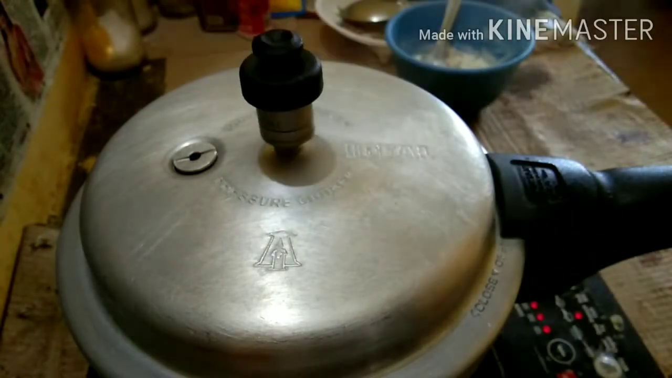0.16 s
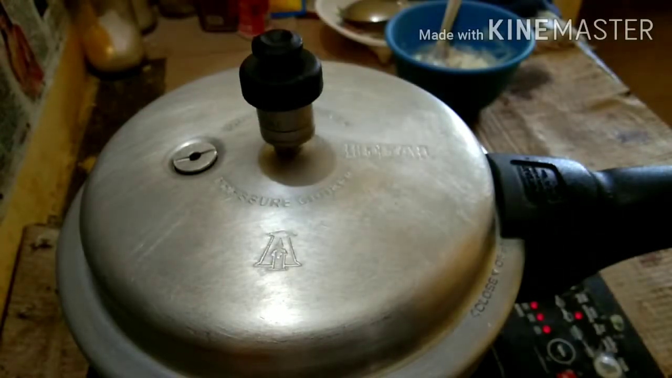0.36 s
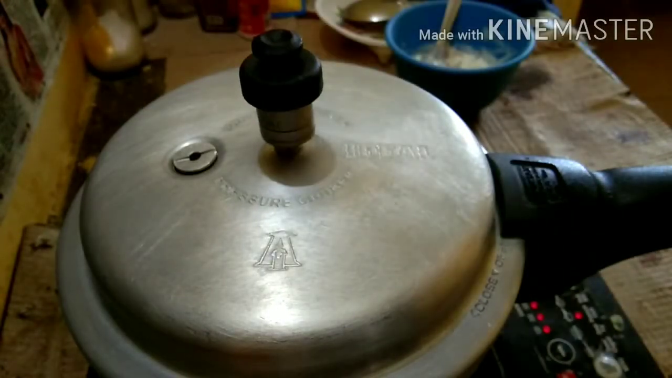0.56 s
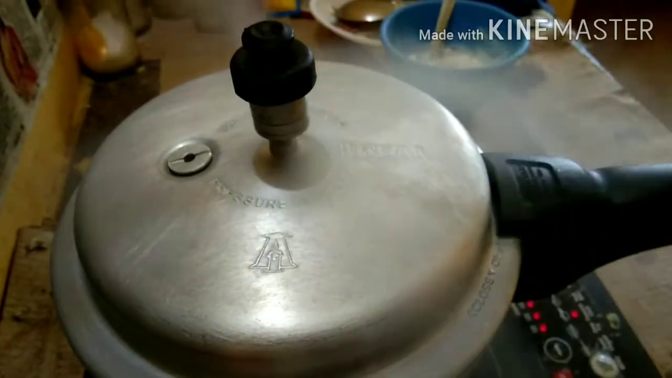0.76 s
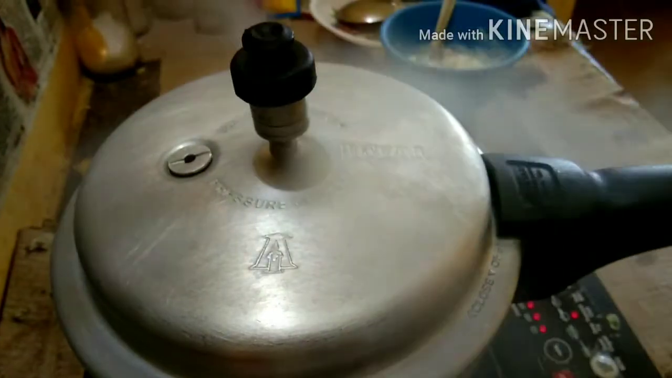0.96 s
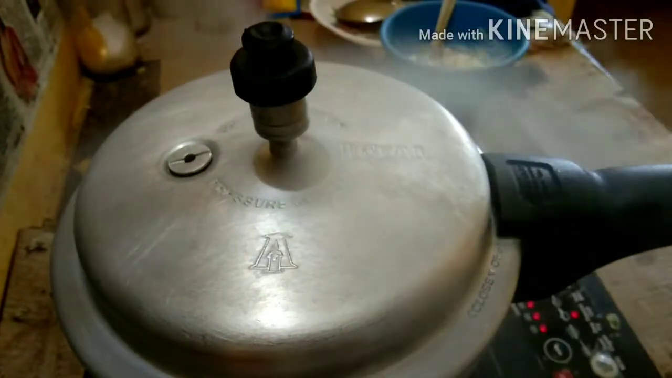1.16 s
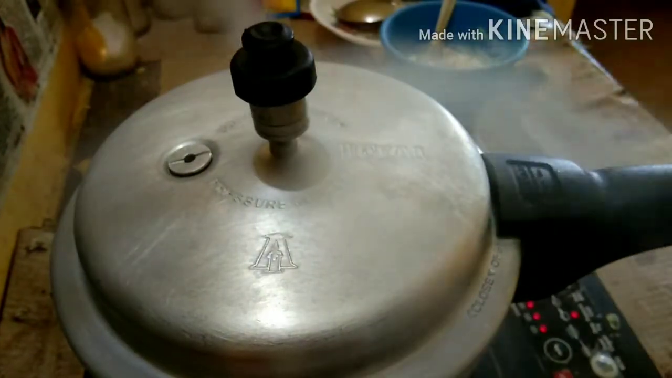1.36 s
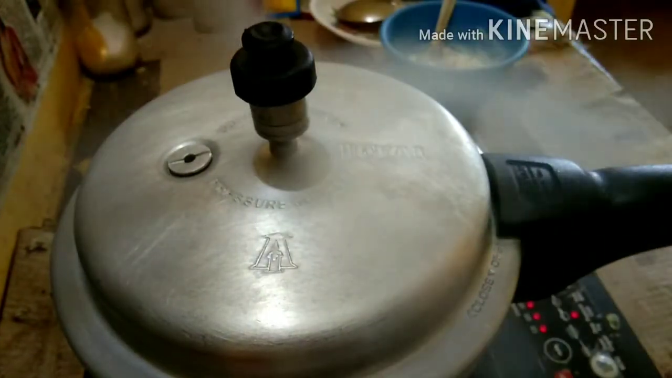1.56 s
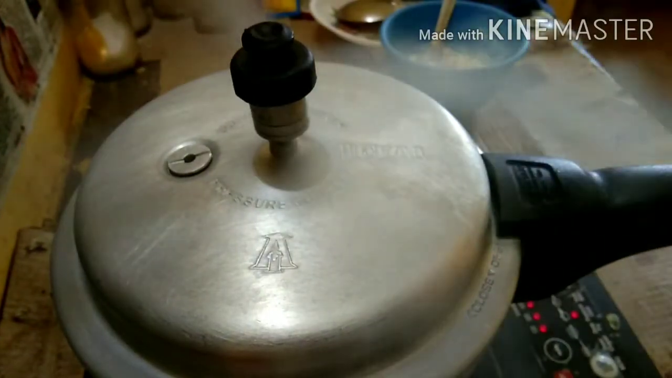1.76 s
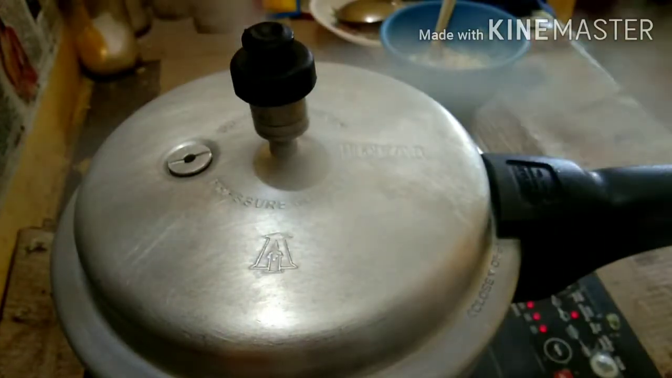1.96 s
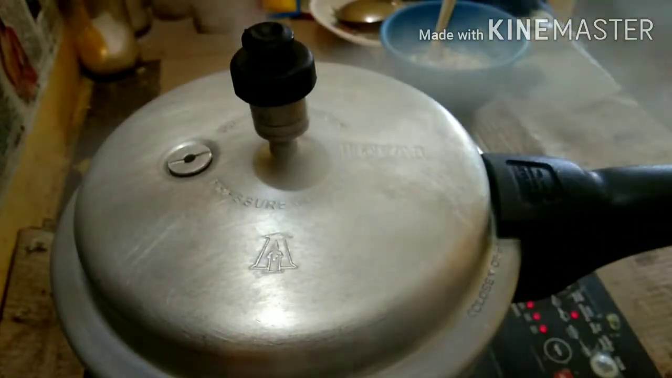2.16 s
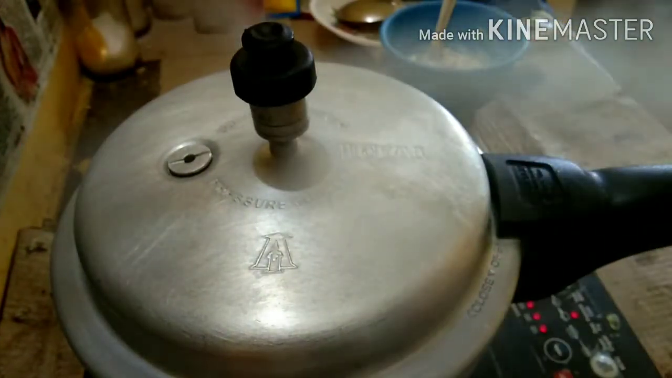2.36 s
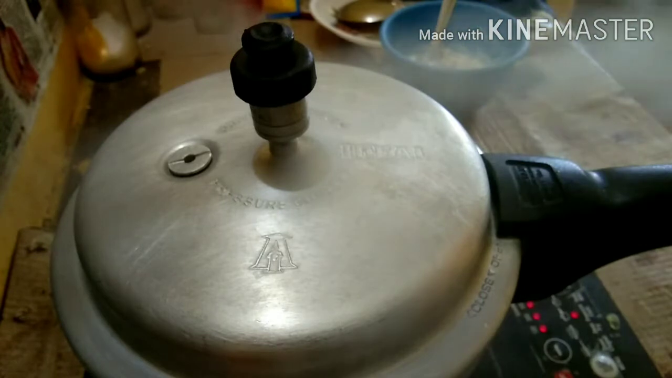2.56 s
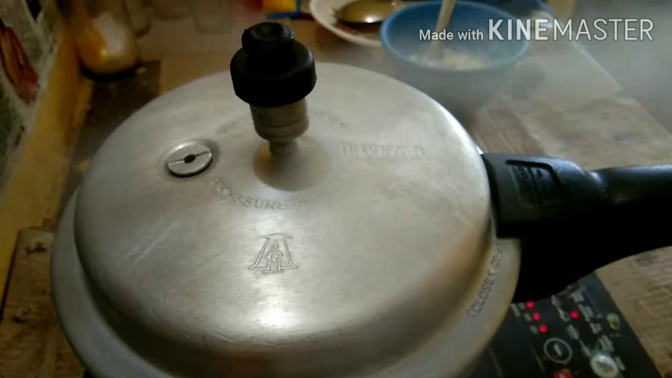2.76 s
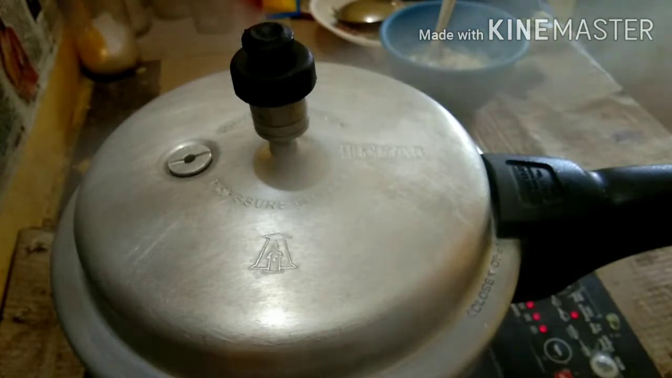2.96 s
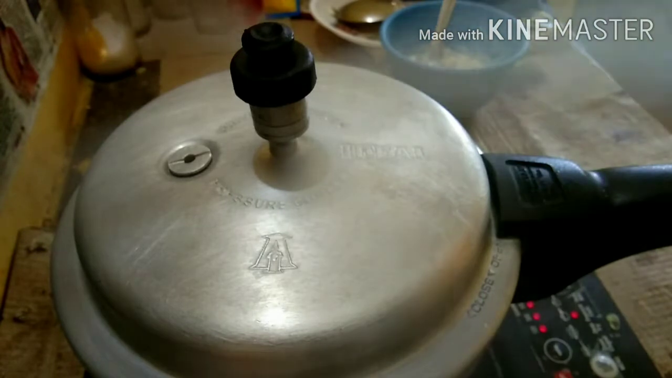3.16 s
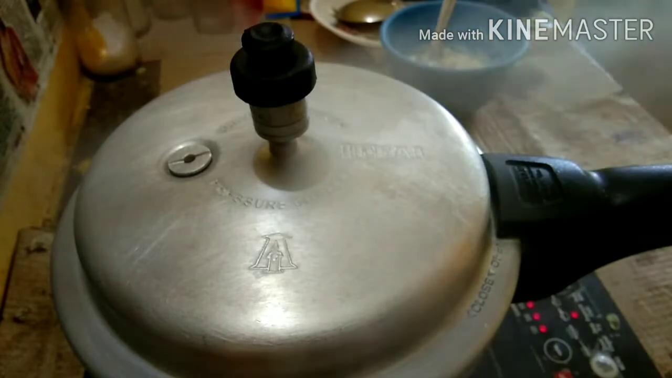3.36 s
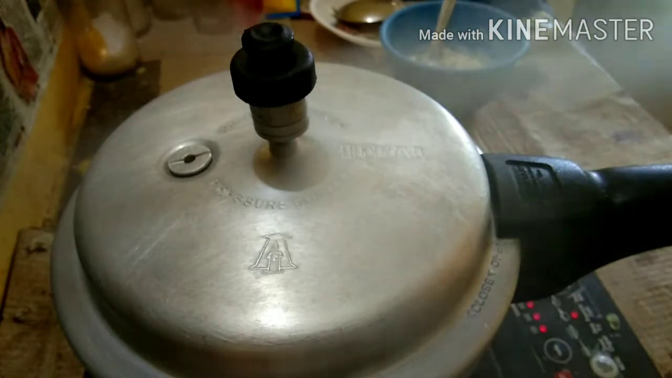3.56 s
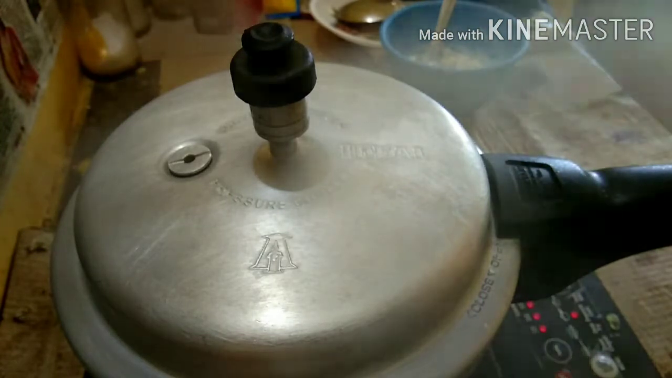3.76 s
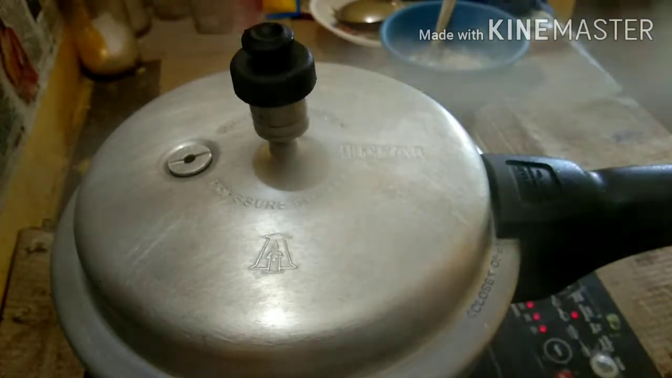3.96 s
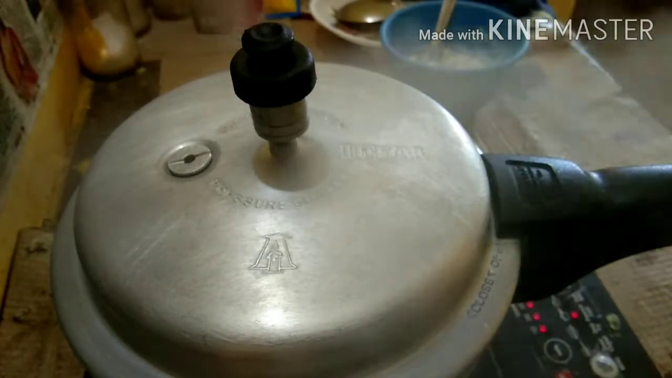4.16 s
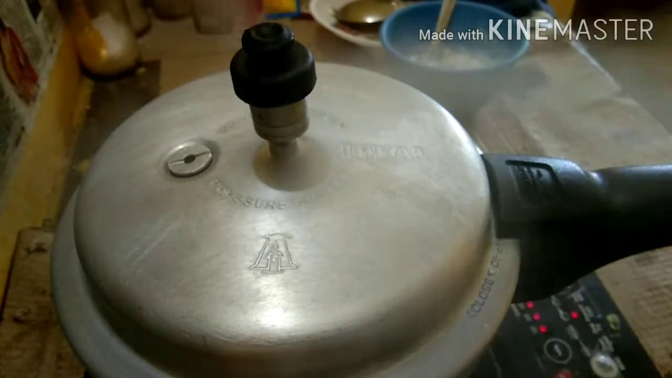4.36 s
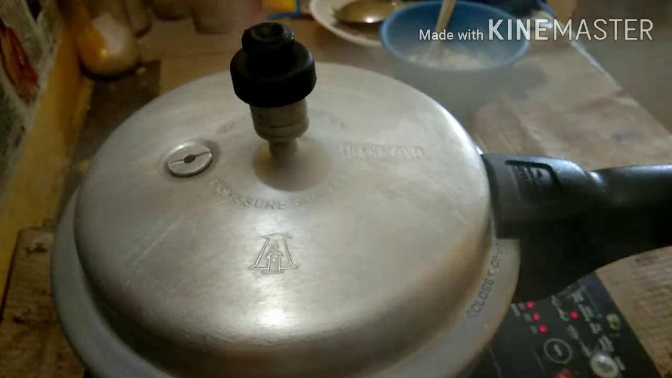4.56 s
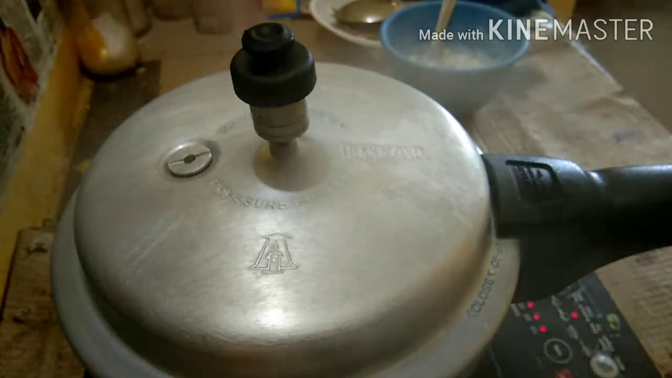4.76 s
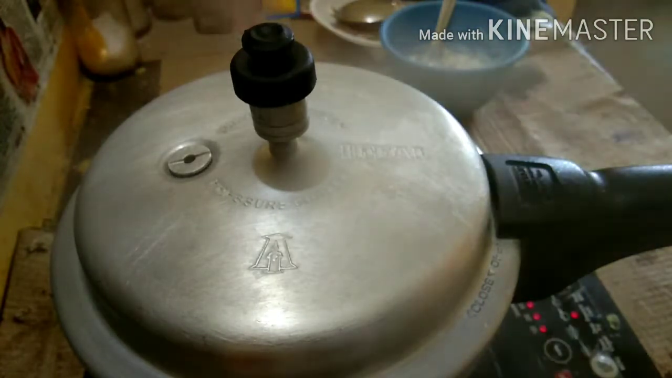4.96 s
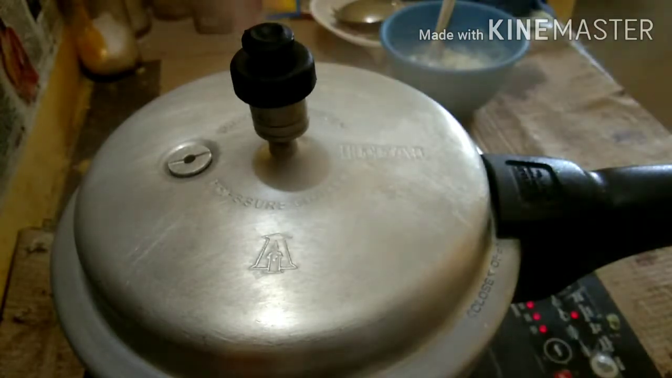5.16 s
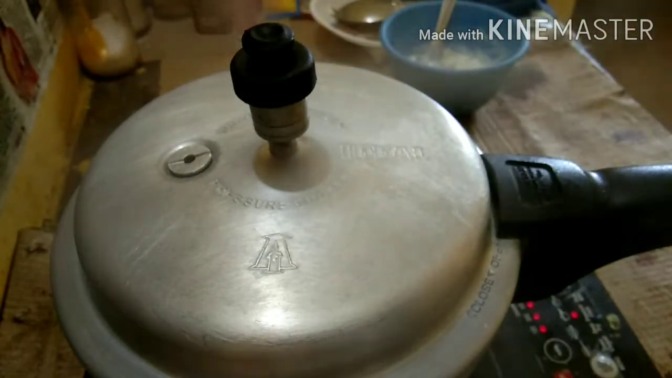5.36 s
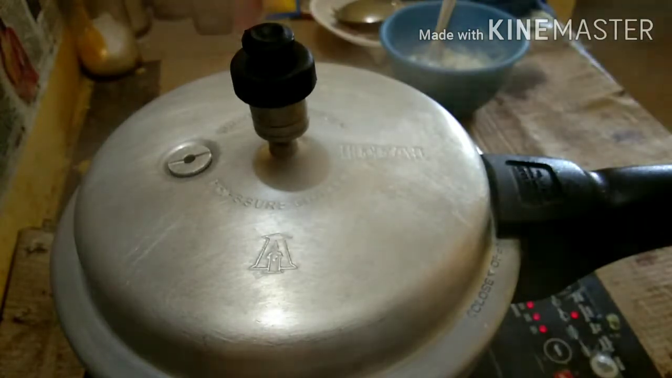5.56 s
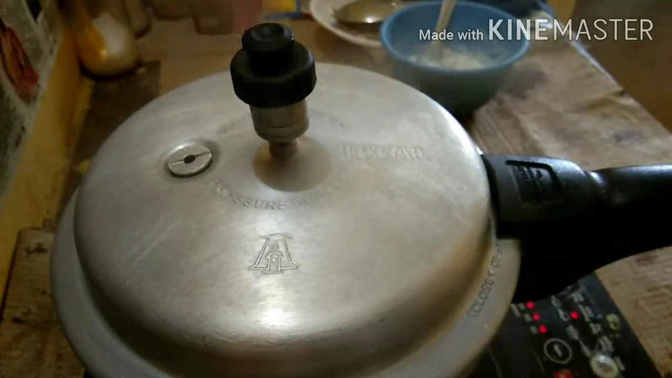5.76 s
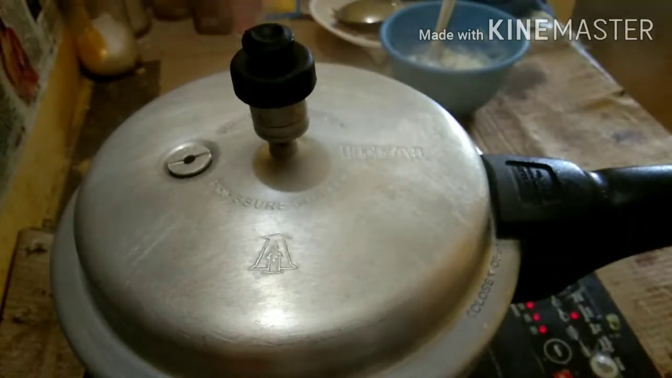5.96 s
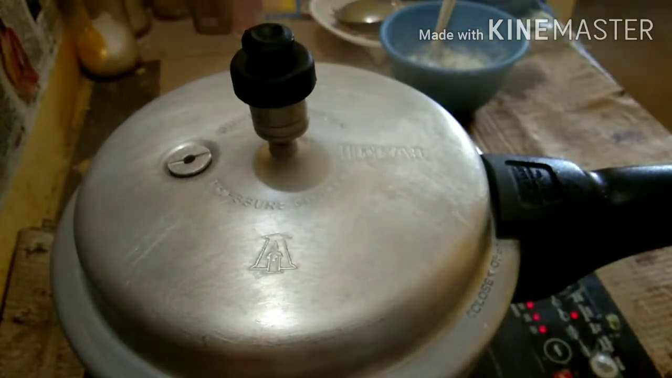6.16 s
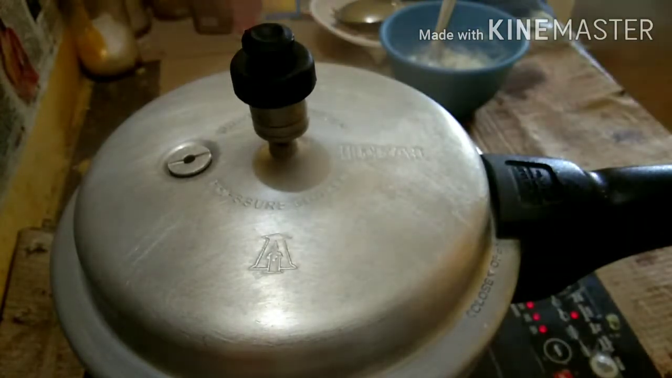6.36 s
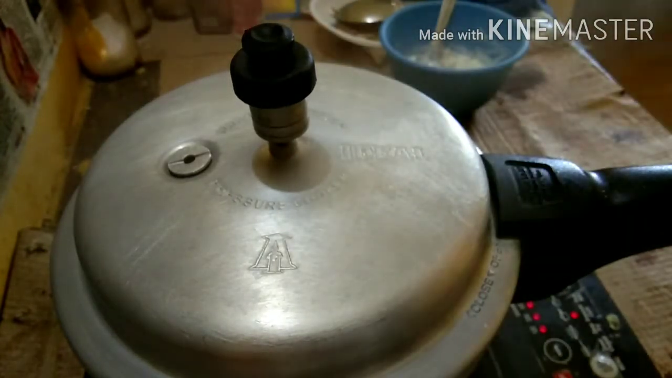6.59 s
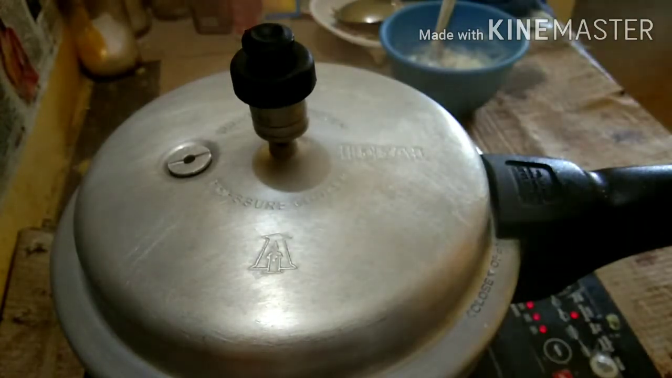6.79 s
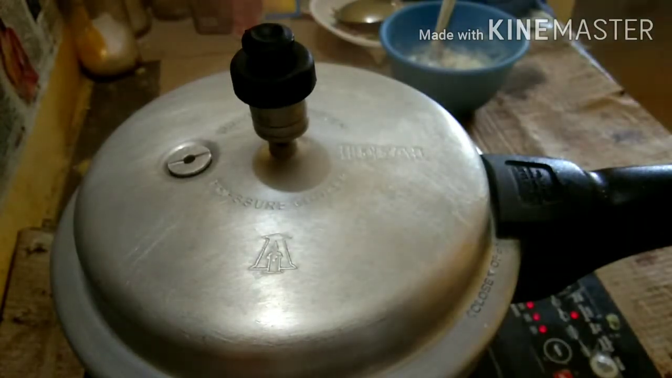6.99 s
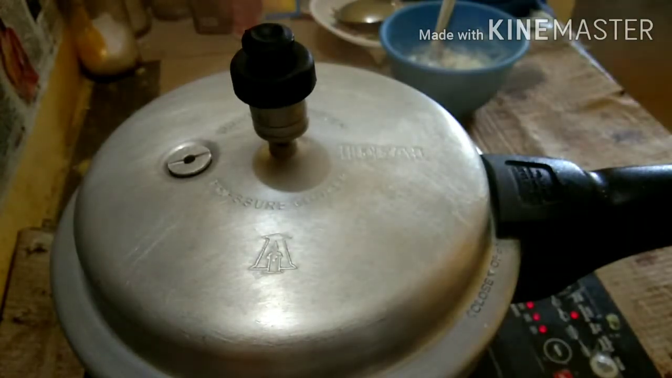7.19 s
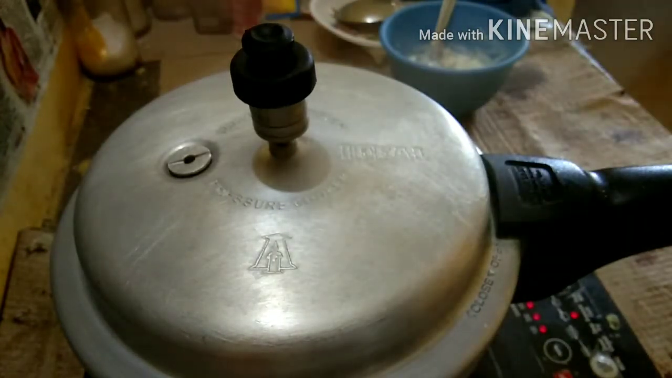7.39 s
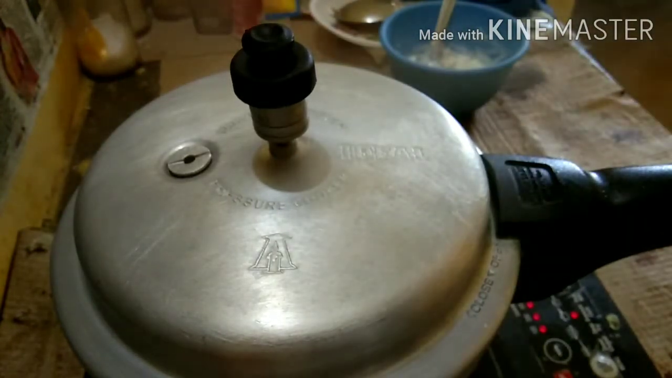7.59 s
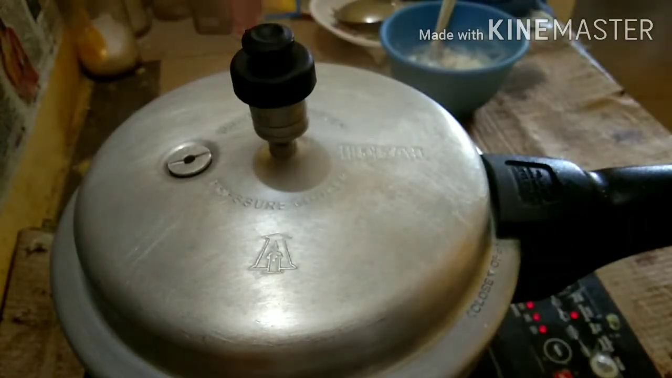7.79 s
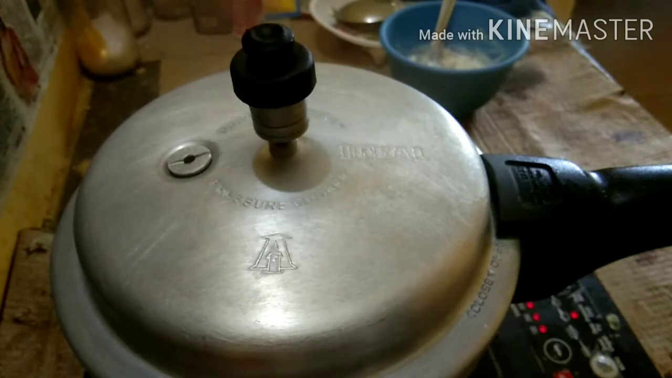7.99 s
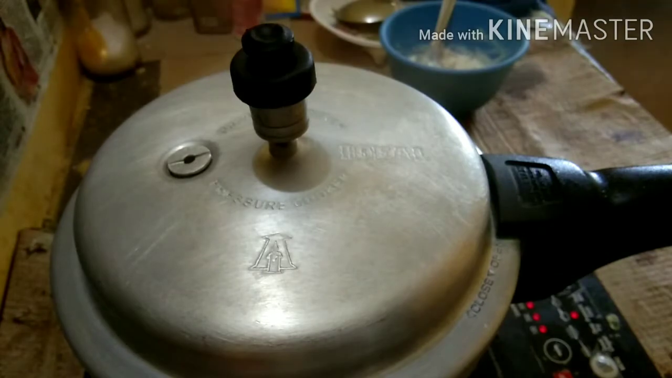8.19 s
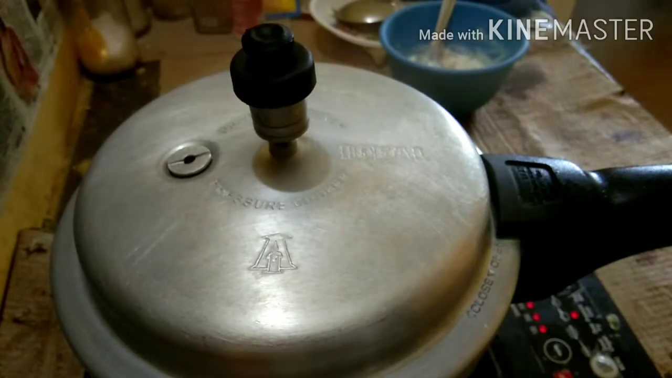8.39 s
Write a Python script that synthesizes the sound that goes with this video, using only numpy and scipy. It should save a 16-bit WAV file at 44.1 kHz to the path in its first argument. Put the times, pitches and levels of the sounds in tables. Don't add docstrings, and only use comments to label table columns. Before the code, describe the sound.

Close phone pickup of a pressure cooker on a hob. Dense, sharp steam roars through the valve almost unchanged for about seven seconds, with fine flutter and slight shifts of colour. The jet chokes off suddenly, the weight knocks lightly on the metal lid and bounces, and the walls ring briefly. Then near silence, with a low fan hum and a faint steam seep creeping up.

```python
import sys
import numpy as np
from scipy import signal
from scipy.io import wavfile
from scipy.ndimage import uniform_filter1d

SR = 44100
rng = np.random.default_rng(int(sys.argv[2]) if len(sys.argv) > 2 else 0)


def volts_from_decibels(level):
    exponent = np.asarray(level, float) / 20
    return 10 ** exponent


def persist_wave(psi):
    counts = np.round(np.clip(psi, -1, 1) * 32767).astype(np.int16)
    wavfile.write(sys.argv[1], SR, np.atleast_2d(counts).T)


N = 371763
T = np.arange(N) / SR
HOP, BINS = 512, np.fft.rfftfreq(2048, 1 / SR)
FRAMES = np.arange(N // HOP + 5) * HOP / SR

SINKS_S, SHUTS_S, SHUT_TIME_S = (6.9, 7.08), 7.3245, 0.0058
SAG_S, CHOKE_S = 1.5, 0.041
RECOVERS_S = 7.67


def evened(x):
    return x / np.sqrt(np.mean(x ** 2) + 1e-20)


def read(points, hz):
    f, value = np.transpose(points)
    return np.interp(np.log(hz + 1), np.log(f + 1), value)


def bump(hz, width):
    return 1 / (1 + (2 * (BINS[:, None] - hz) / width) ** 2)


def hiss(field_db):
    a, b = rng.standard_normal((len(FRAMES), len(BINS), 2)).T
    spectrum = (a + 1j * b) * volts_from_decibels(field_db)
    return evened(signal.istft(spectrum, nperseg=2048, noverlap=2048 - HOP)[1][:N])


def streaks(bins, frames):
    noise = rng.standard_normal((len(FRAMES), len(BINS))).T
    for _ in range(2):
        noise = uniform_filter1d(noise, int(bins), 0)
        noise = uniform_filter1d(noise, int(frames), 1)
    return evened(noise)


def band(x, lo_hz, hi_hz):
    return signal.sosfilt(signal.butter(4, [lo_hz, hi_hz], "band", fs=SR, output="sos"), x)


def burst(noise, lo_hz, hi_hz, length_s):
    arch = np.sin(np.pi * np.clip(T[:len(noise)] / length_s, 0, 1))
    return evened(band(noise, lo_hz, hi_hz)) * arch


def stages(t):
    full = np.exp(-t / SAG_S)
    sunk = np.interp(t, SINKS_S, [0, 1])
    choke = np.clip(1 + (t - SHUTS_S) / CHOKE_S, 0, 1)
    return full, sunk, choke


def creep(db_per_s):
    return db_per_s * np.maximum(T - RECOVERS_S, 0)


# (frequency [Hz], level [dB per Hz])
JET_COLOUR = [(470, -53.5), (800, -35), (1220, -28), (1450, -17), (1950, -15), (2860, -18.5), (3450, -11),
              (4410, -10), (5650, 0.5), (6320, -5.5), (7240, 0.5), (8820, -13.5), (10800, -18),
              (12300, -26), (15400, -19)]
# (frequency [Hz], width [Hz], level [dB])
SINKING_PEAKS = [(1600, 460, 3), (2290, 560, -4.5), (3580, 600, -1.5), (4620, 500, 5.5), (6980, 310, 3.5),
                 (7600, 610, -5), (9000, 300, 2), (9160, 350, 6.5), (10400, 500, -5), (11200, 400, 4.5),
                 (12300, 800, 3.5), (14500, 1500, -2)]
VENT_HZ = [1570, 1760, 2180, 2337, 2800, 3130, 3280, 3790, 4200, 4420, 4630, 5150, 5280, 5450, 5595, 5950,
           6400, 6597, 6740, 6985, 7150, 7210, 7500, 7888, 8050, 8200, 9336, 10440, 14200, 15300]
# (width [Hz], level [dB])
VENT_SHAPE = [(150, -0.5), (80, -8), (60, 0), (50, 3.5), (200, -11), (60, -1.5), (80, -3.5), (70, -2.5),
              (110, 1.5), (170, -7.5), (200, 4), (120, 4), (110, -6.5), (100, 0.5), (79.5, 2.5), (249, 1.5),
              (120, -3.5), (55.6, 3.5), (90, -3), (29.7, 5), (35, -3.5), (65, 2), (100, 1.5), (50, 5.5),
              (60, -8), (90, 0.5), (35, 8.5), (300, 3.5), (150, 2.5), (150, -5)]
# (time [s], path [mm])
ECHO_PATH = [(0, 14.05), (1.2, 14.4), (2.2, 14.65), (2.9, 13.8), (3.9, 13.8), (4.4, 14.65), (5.0, 13.95),
             (6.2, 13.7), (7.0, 14.3)]
# (frequency [Hz], level [dB per Hz])
AWAY_COLOUR = [(300, -27.5), (1200, -22), (2200, -14), (2900, -13), (3900, -14), (4800, -5), (5900, 1),
               (6600, 1), (7600, -4), (8800, -14.5), (10300, -22.5), (12200, -21.5), (15400, -24)]
SOUND_MM_PER_S, RIM_SHORTER = 343000, .92
NOTCH_WIDTH_HZ, NOTCH_DB, RIM_NOTCH_DB = 700, -6.5, -4.0
NOTCH_FILLS = .6
MEAN_NOTCH_HZ, MEAN_NOTCH_WIDTH_HZ, MEAN_NOTCH_DB = 12330, 900, 1.9
JET_DB, SAG_DB, SURGE_DB, AWAY_DB = -22, -1.28, 1.0, -8
BODY_DB, TOP_DB = (1.5, -1.5), (0, -0.5)
CHOKE_DB, CHOKE_EDGES_DB = -2, 3


def jet():
    f = BINS[:, None]
    full, sunk, choke = stages(FRAMES)
    field = read(JET_COLOUR, f)
    field = field + sunk * sum(db * bump(hz, width) for hz, width, db in SINKING_PEAKS)

    path_s, path_mm = np.transpose(ECHO_PATH)
    notch_hz = SOUND_MM_PER_S / (2 * np.interp(FRAMES, path_s, path_mm))
    notches = NOTCH_DB * bump(notch_hz, NOTCH_WIDTH_HZ)
    notches += RIM_NOTCH_DB * bump(notch_hz / RIM_SHORTER, NOTCH_WIDTH_HZ / 2)
    field += (1 - NOTCH_FILLS * sunk) * notches
    field += (1 - sunk) * MEAN_NOTCH_DB * bump(MEAN_NOTCH_HZ, MEAN_NOTCH_WIDTH_HZ)

    body, top = (a * full + b * sunk + CHOKE_EDGES_DB * choke for a, b in (BODY_DB, TOP_DB))
    field += np.clip((4500 - f) / 1000, 0, 1) * (body - body.mean())
    field += np.clip((f - 8500) / 1000, 0, 1) * (top - top.mean())
    field += sum(db * bump(hz, width) for hz, (width, db) in zip(VENT_HZ, VENT_SHAPE))
    near = field + (.9 + 1.4 * f / 12000) * streaks(2, 90) + .5 * streaks(12, 30)

    flutter_db = 0.28 * evened(band(rng.standard_normal(N), 2.1, 37))
    flutter_db += 0.59 * evened(band(rng.standard_normal(N), 45, 600))
    valve = np.clip((SHUTS_S - T) / SHUT_TIME_S + .5, 0, 1)
    full, sunk, choke = stages(T)
    level_db = JET_DB + SAG_DB * (1 - full) + SURGE_DB * sunk + CHOKE_DB * choke + flutter_db
    strength = volts_from_decibels(level_db) * valve
    return hiss(near) * strength, hiss(read(AWAY_COLOUR, f)) * strength * volts_from_decibels(AWAY_DB)


# (time [s], knock level [dB], puff level [dB])
LANDING = [
    (7.3295, -27.5, -50),
    (7.3635, -38, -36),
    (7.384, -42, -44),
]
# (frequency [Hz], level [dB], t60 [s])
LID = [(670, -19, .04), (1115, -14, .055), (1240, -20, .04), (1550, -6.5, .028), (1950, -7.5, .026),
       (2800, -13, .022)]
KNOCK, PUFF = (900, 2200, .01), (4900, 7800, .012)  # (low [Hz], high [Hz], length [s])
THUD, THUD_DB = (200, 1000, .011), -24
SCRATCH_DB, SEATING_S = -14, .005


def weight():
    t = T[:6000]
    decay_s = np.maximum(t - SEATING_S, 0)
    ring = sum(volts_from_decibels(db - 60 * decay_s / t60) * np.sin(2 * np.pi * hz * t) for hz, db, t60 in LID)
    ring = ring * np.clip(t / SEATING_S, 0, 1)
    out = np.zeros(N + len(t))
    noises = rng.standard_normal((len(LANDING), len(t)))
    for (s, knock_db, puff_db), noise in zip(LANDING, noises):
        knock = ring + volts_from_decibels(SCRATCH_DB) * burst(noise, *KNOCK) + volts_from_decibels(THUD_DB) * burst(noise, *THUD)
        start = round(s * SR)
        out[start:start + len(t)] += volts_from_decibels(knock_db) * knock + volts_from_decibels(puff_db) * burst(noise, *PUFF)
    return out[:N]


# (frequency [Hz], t60 [s])
KITCHEN_T60 = [(300, 0.33), (1500, 0.44), (4000, 0.45), (7000, 0.34), (9000, 0.41), (11000, 0.35),
               (13000, 0.25), (15000, 0.29)]


def kitchen(x):
    taps = np.zeros(SR // 2)
    at = np.arange(200, len(taps) - 20, 20)
    taps[at + rng.integers(0, 20, len(at))] = rng.choice([-1., 1.], len(at))
    hz, t, z = signal.stft(taps, SR, nperseg=256)
    decay = volts_from_decibels(-60 * t / read(KITCHEN_T60, hz)[:, None])
    tail = signal.istft(z * decay, SR, nperseg=256)[1]
    return signal.oaconvolve(x, tail / np.linalg.norm(tail))[:N]


# (frequency [Hz], level [dB per Hz])
LEAK_COLOUR = [(1180, -32.5), (2000, -8.5), (2740, -6), (3930, -6), (4310, -7), (6730, 1.5), (8760, -15),
               (10800, -22), (12000, -21), (13100, -26), (15400, -33)]
LEAK_DB, LEAK_DB_PER_S = -69.5, 7.5


def leak():
    field = read(LEAK_COLOUR, BINS[:, None])
    field = field + 9 * bump(6487, 25)
    field += 3 * bump(7500, 700) - 2.5 * bump(8500, 600) + 4 * bump(10800, 250)
    field += 4 * bump(13100, 250) - 5 * bump(12000, 700) - 4 * bump(13800, 400)
    field = field + 1.5 * streaks(6, 10)
    return volts_from_decibels(LEAK_DB + creep(LEAK_DB_PER_S)) * hiss(field)


# (frequency [Hz], level [dB per Hz])
HOB_COLOUR = [(30, -44), (55, -36.5), (75, -22), (105, -11.5), (200, -10.5), (330, -9), (500, -12),
              (760, -14.5), (1200, -17.5), (1600, -23.5), (3000, -36), (4500, -57)]
# (multiple of the blade rate [1], level re the hob [dB])
FAN = [(1, -3.5), (2, -8), (3, -12), (4, -13.5), (5, -21)]
FAN_HZ, HOB_DB, HOB_DB_PER_S = 245.7, -65.5, 10
HELD_DB, FREED_S = -4.5, 0.27
DRONE_S, DRONE_HZ, DRONE_DB, DRONE_RISE_S = 8.24, 188, -60.5, 0.087
DRONE_FADES_S, DRONE_FADE_DB_PER_S = 8.38, -150


def hob():
    waver = .0005 * evened(band(rng.standard_normal(N), 1, 6))
    turns = np.cumsum(FAN_HZ * (1 + waver)) / SR
    tone = sum(np.sqrt(2) * volts_from_decibels(db) * np.sin(2 * np.pi * (k * turns + rng.random())) for k, db in FAN)
    wash = volts_from_decibels(2.0) * hiss(read(HOB_COLOUR, BINS[:, None]) + 1.2 * streaks(1.9, 3.5))
    drone_db = DRONE_DB + DRONE_FADE_DB_PER_S * np.maximum(T - DRONE_FADES_S, 0)
    swell = np.clip((T - DRONE_S) / DRONE_RISE_S, 0, 1) * volts_from_decibels(drone_db)
    drone = swell * np.sqrt(2) * np.sin(2 * np.pi * DRONE_HZ * T)
    held_db = HELD_DB * np.clip((SHUTS_S - T) / FREED_S + .5, 0, 1)
    return volts_from_decibels(HOB_DB + held_db + creep(HOB_DB_PER_S)) * (wash + tone) + drone


# (time [s], centre [Hz], width [Hz])
SPLITS = [(.27, 9650, 1500), (.78, 9700, 1500), (.78, 13150, 1500), (1.13, 6300, 1250), (1.5, 7250, 2000),
          (1.85, 13150, 1500), (2.34, 7300, 2000), (3.41, 6300, 1300), (3.62, 9000, 1500),
          (3.69, 7600, 2700), (4.15, 5200, 1200), (4.92, 5700, 1200), (5.31, 8600, 2100),
          (5.31, 14200, 2200), (5.48, 13800, 1500), (5.8, 9700, 1400), (6.29, 7000, 1400),
          (6.29, 10450, 1500), (7.29, 5750, 1200)]
SPLIT_DB = -28.5
FRAME, FRAME_START = 1024, 817


def splits():
    side, window = np.zeros(N), signal.windows.cosine(2 * FRAME)
    n = np.arange(2 * FRAME)[:, None] + .5 + FRAME / 2
    k = np.arange(FRAME) + .5
    basis, hz = np.cos(np.pi / FRAME * n * k), k * SR / (2 * FRAME)
    for (s, centre_hz, width), lines in zip(SPLITS, rng.standard_normal((len(SPLITS), FRAME))):
        start = FRAME_START + FRAME * (round((s * SR - FRAME_START) / FRAME) - 1)
        in_band = abs(hz - centre_hz) < width / 2
        level = volts_from_decibels(SPLIT_DB + read(JET_COLOUR, centre_hz))
        side[start:start + 2 * FRAME] += level * evened(basis @ (lines * in_band)) * window
    return side


def scene():
    toward, away = jet()
    knocks = weight()
    walls = kitchen(away + volts_from_decibels(-12) * knocks)
    mono = toward + knocks + walls + hob() + leak()
    return np.array([mono, mono])


def roll_off(x):
    return signal.sosfilt(signal.butter(12, 16340, fs=SR, output="sos"), x)


def record(dry):
    low_cut = signal.butter(2, 85, "high", fs=SR, output="sos")
    rumble = volts_from_decibels(-5.5) * signal.sosfilt(low_cut, band(dry ** 2, 15, 1500))
    edge = signal.firwin(2047, 15500, window=("kaiser", 10), fs=SR)
    mid = signal.oaconvolve(dry + rumble, edge[None], "same")
    side = splits()
    return roll_off(mid + np.array([side, -side]))


dry = scene()
out = record(dry)
persist_wave(out)
```